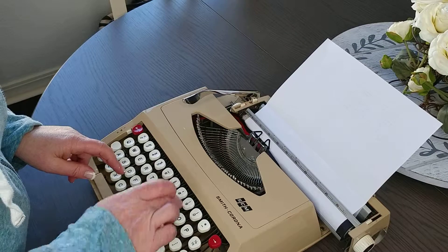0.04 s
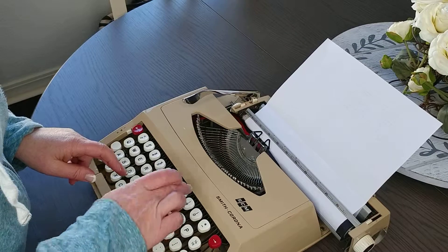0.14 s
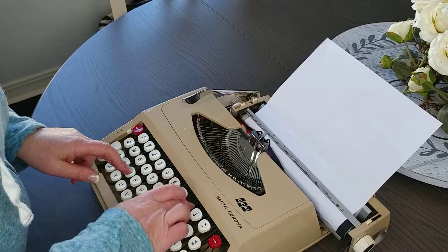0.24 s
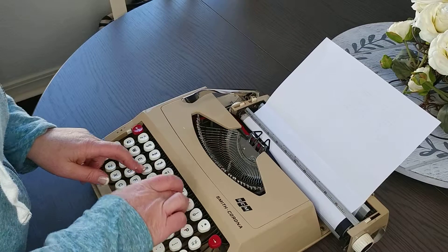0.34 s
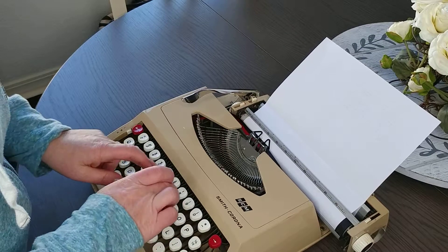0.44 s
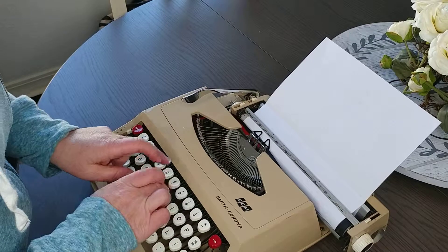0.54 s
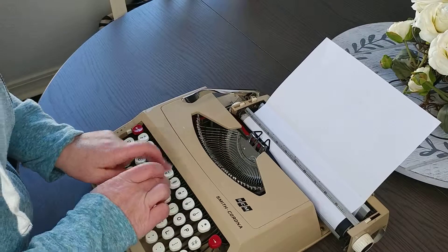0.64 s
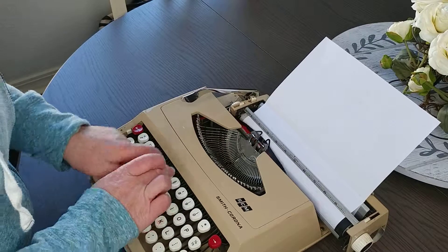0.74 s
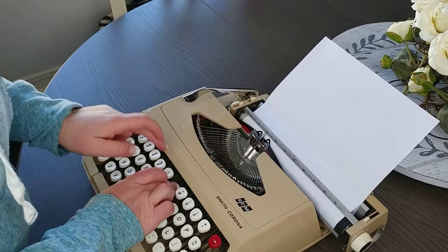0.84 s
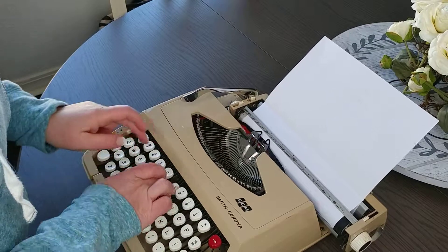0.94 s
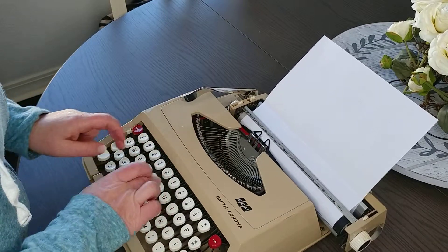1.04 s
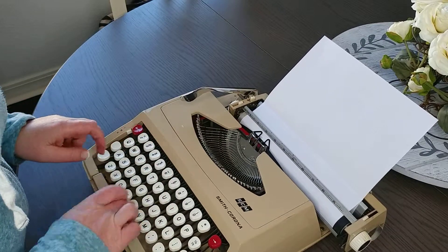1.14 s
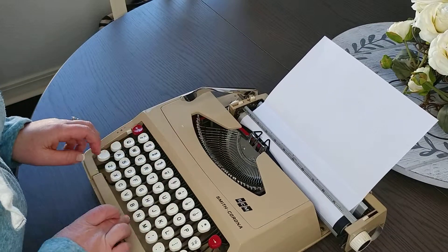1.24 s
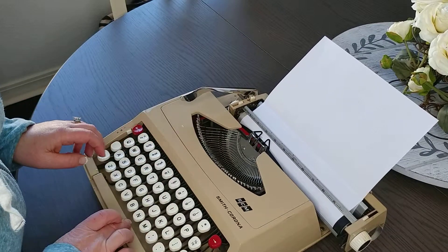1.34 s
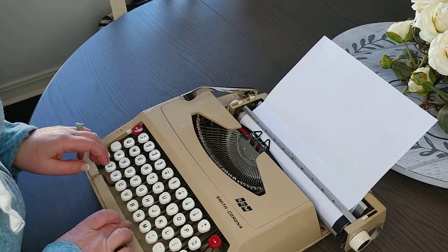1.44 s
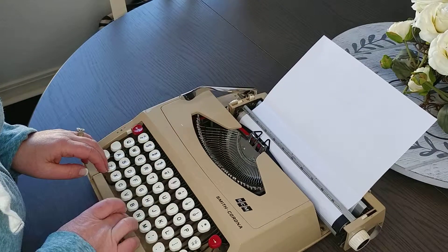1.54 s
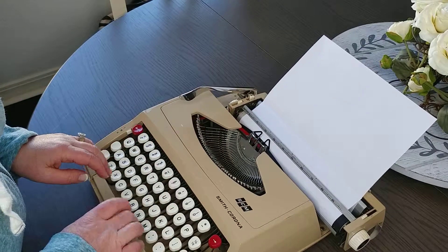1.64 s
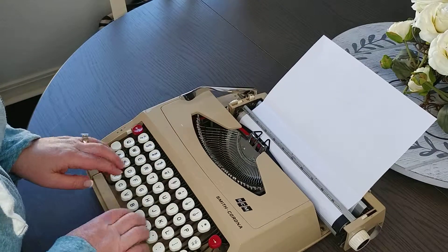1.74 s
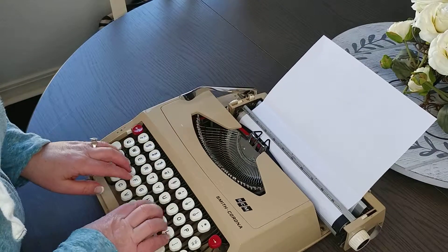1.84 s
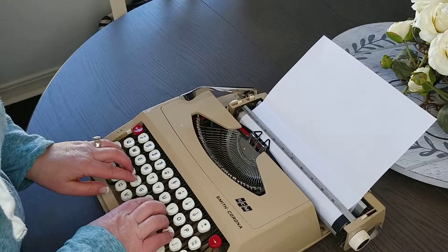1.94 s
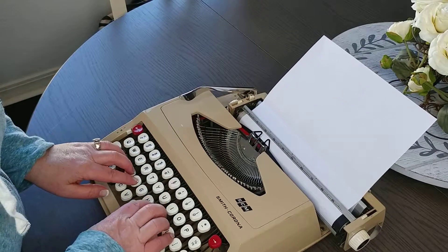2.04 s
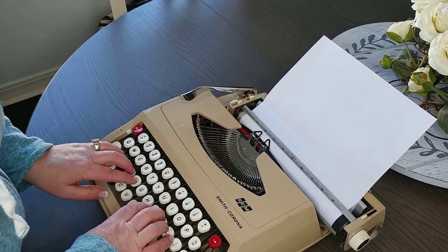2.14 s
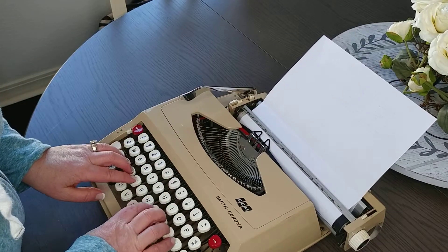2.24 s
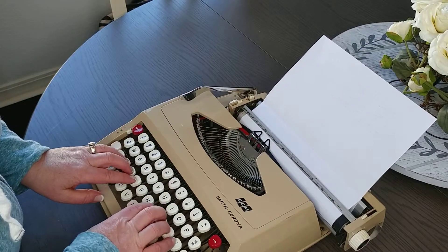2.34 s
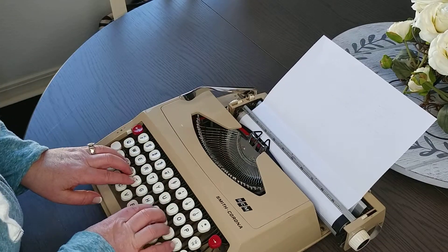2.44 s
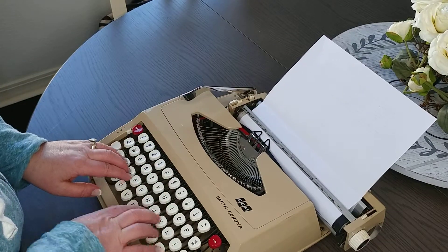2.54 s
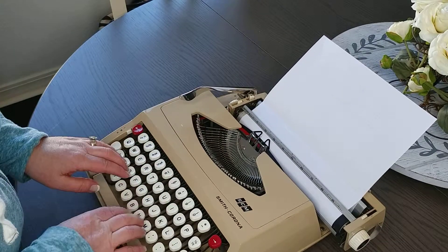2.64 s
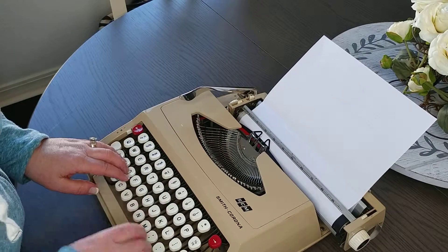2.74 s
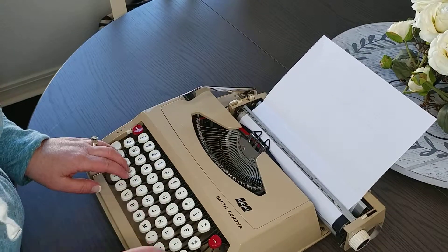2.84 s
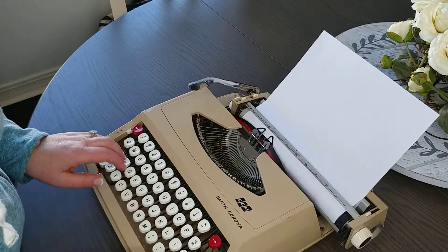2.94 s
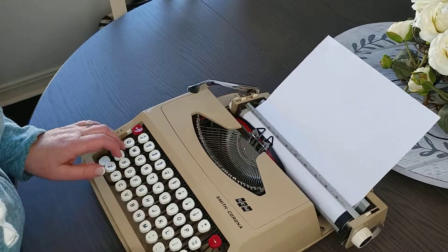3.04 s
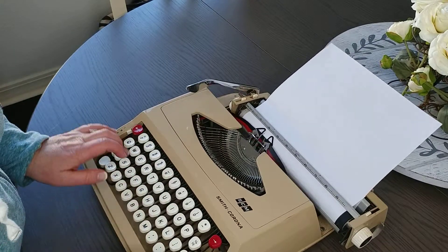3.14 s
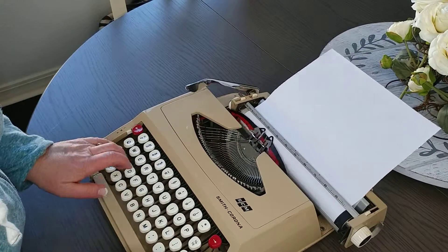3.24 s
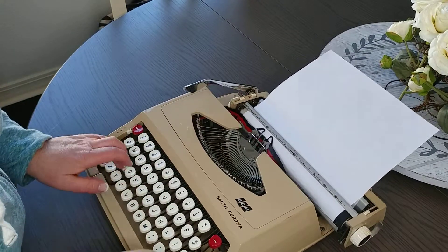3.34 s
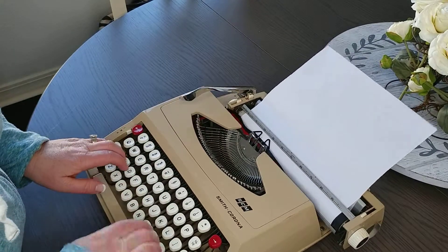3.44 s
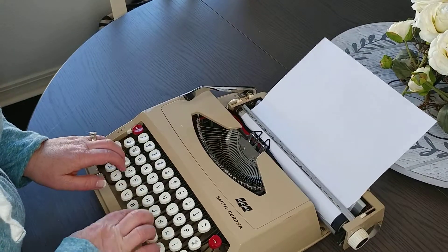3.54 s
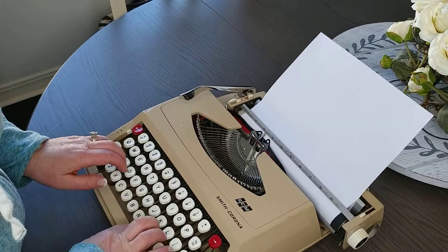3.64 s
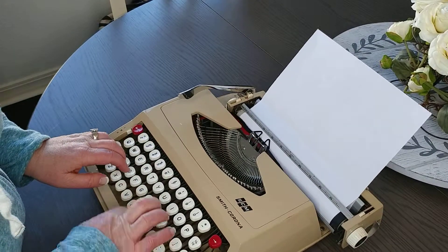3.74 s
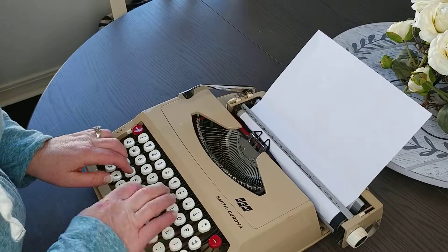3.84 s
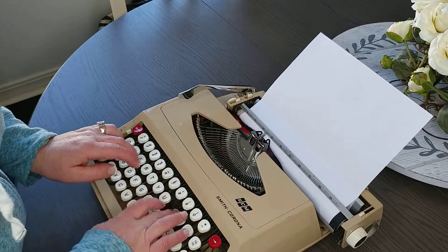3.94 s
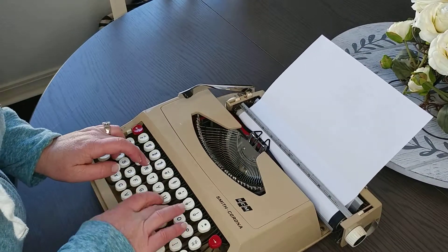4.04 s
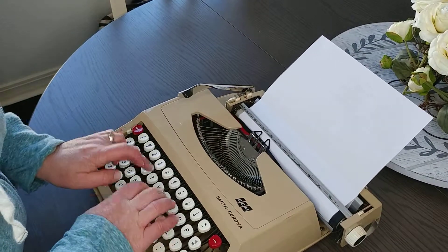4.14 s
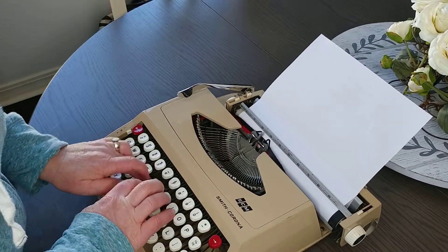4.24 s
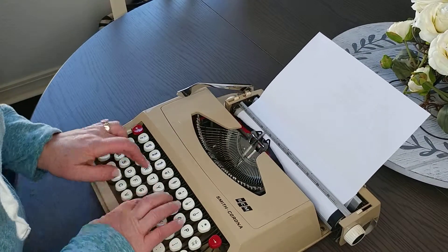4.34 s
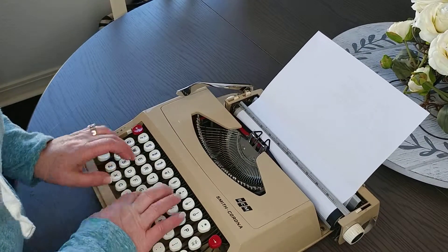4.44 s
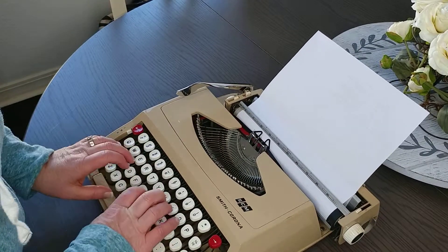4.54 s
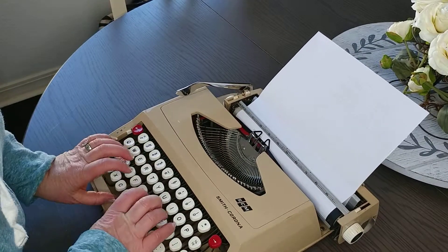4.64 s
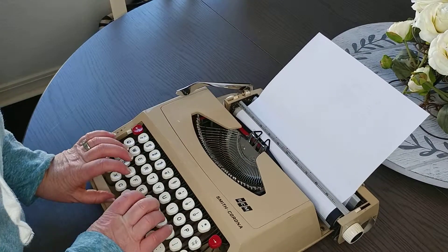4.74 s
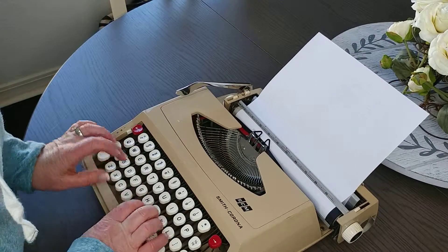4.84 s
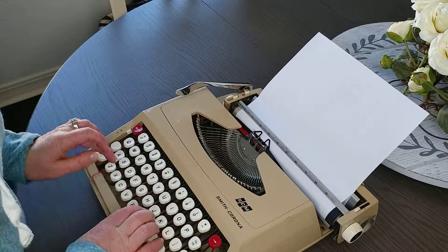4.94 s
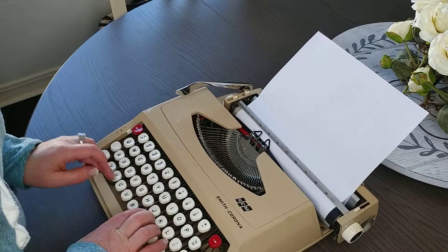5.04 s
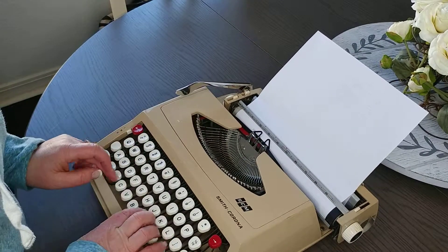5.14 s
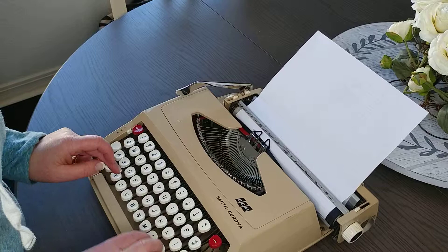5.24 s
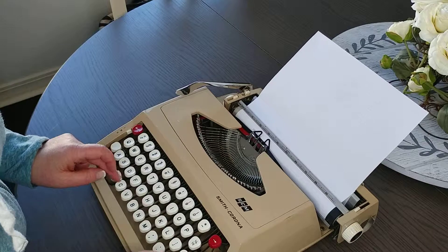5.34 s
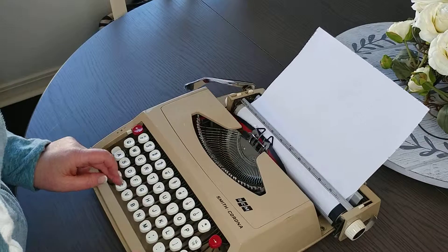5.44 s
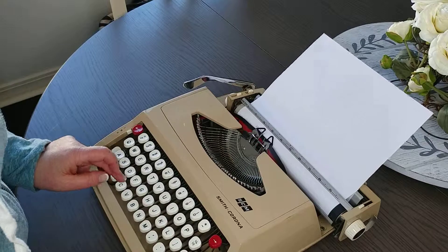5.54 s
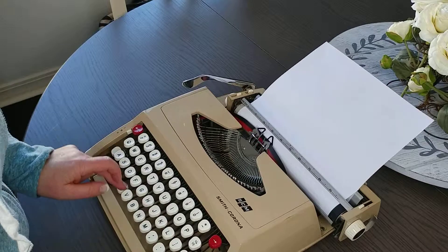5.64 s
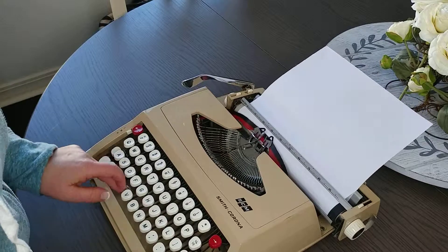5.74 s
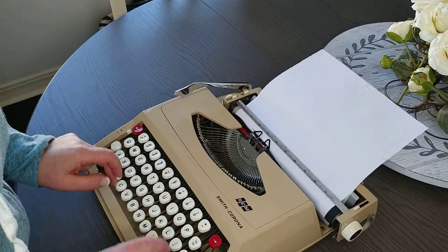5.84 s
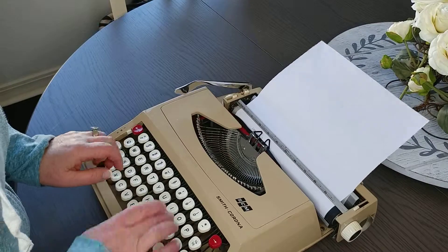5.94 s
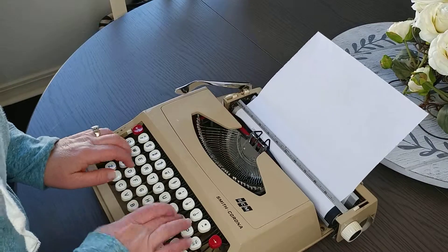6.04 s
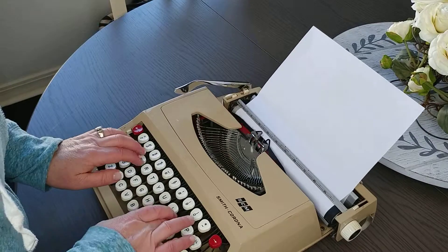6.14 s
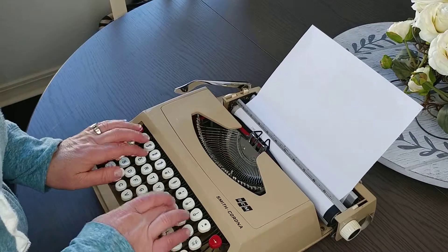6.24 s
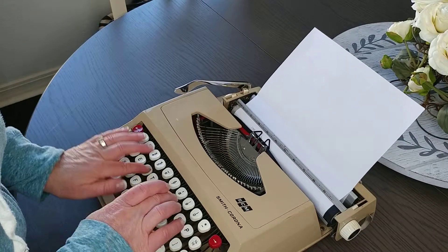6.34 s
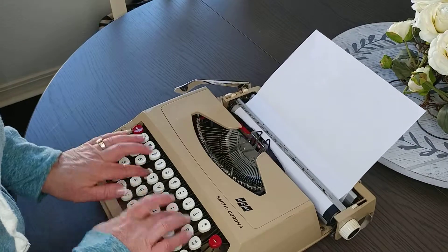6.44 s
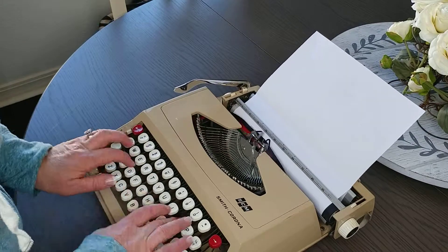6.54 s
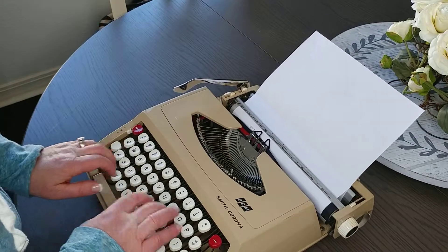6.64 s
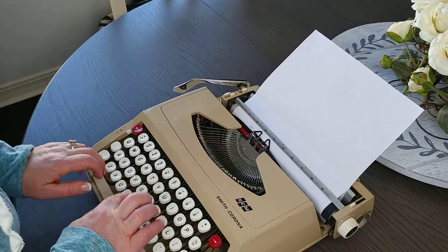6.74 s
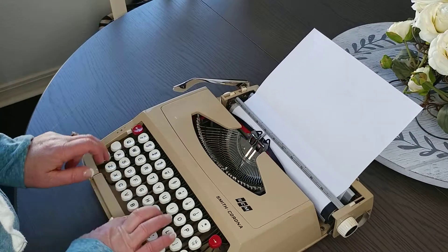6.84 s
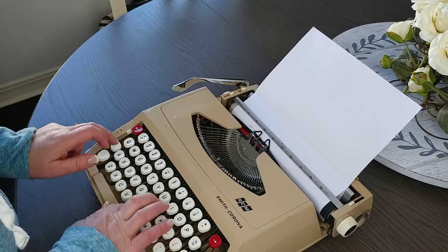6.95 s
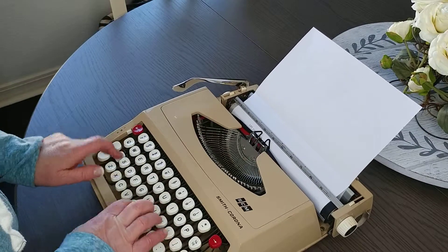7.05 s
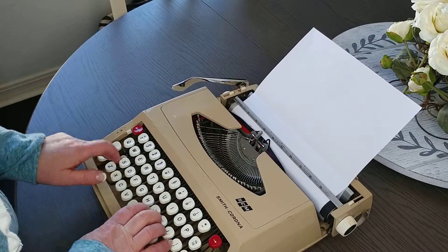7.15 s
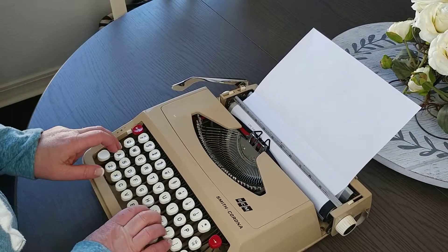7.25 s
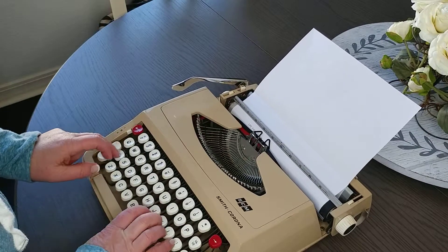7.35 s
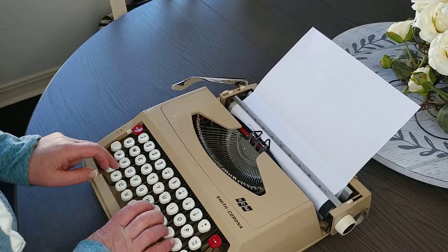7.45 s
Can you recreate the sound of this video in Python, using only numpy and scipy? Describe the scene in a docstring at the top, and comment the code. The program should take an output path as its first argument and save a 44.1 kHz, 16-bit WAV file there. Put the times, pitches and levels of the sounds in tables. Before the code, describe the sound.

Close to the microphone, a manual typewriter's typebars crack against the roller in three short, irregular groups separated by pauses. Lighter rattles and clicks come from the returning levers, the space bar and the shift lifting and dropping the carriage. The blows thud slightly through a wooden table and get a short echo from the quiet room, over a very faint ventilation hum.

```python
"""A quiet room, a portable manual typewriter on a wooden table, a phone's stereo microphones just above.
Close up, each key rattles its linkage, and the typebar cracks against the platen and drops back;
the space bar and the shift clack in between. The blows ring the metal frame and thump the table.
Farther off, ceiling and walls answer; a sleeve brushes between words, over a faint ventilation hum."""
import sys
import numpy as np
from scipy import signal
from scipy.fft import rfft, irfft, next_fast_len
from scipy.io import wavfile
from scipy.ndimage import uniform_filter1d

SR = 44100
rng = np.random.default_rng(int(sys.argv[2]) if len(sys.argv) > 2 else 0)


def wrap_up_sound(samples):
    """Save the sound to the file named by the first command line argument, as 16-bit audio."""
    columns = np.atleast_2d(samples).T
    # keep every value between -1 and 1, then stretch to whole-number steps
    tamed = np.clip(columns, -1, 1)
    steps = np.round(tamed * 32767).astype(np.int16)
    wavfile.write(sys.argv[1], SR, steps)


N = 331191
RING = np.arange(16384) / SR  # time axis of one blow
SWING_S = .036  # from the finger's touch to the blow on the platen
LIFT_S = .037  # from a push on the shift key until the carriage tops out

# typebar on platen: t/s, level/dB, brightness/dB, knock/dB, finger's touch/dB, table top/dB
STRIKES = [(0.3215, -13.5, -0.1, -2.5, -36, -36), (0.7632, -15, -1, -1.5, -55, -45),
           (0.9253, -15.5, -3, -0.5, -31.5, -36), (3.2841, -16.5, 1.5, 0, -45, -59),
           (3.7037, -17.5, -0.5, 4.5, -42, -40), (4.0155, -15.5, -1.2, 0.3, -38.5, -36.5),
           (4.28, -16.5, -1.2, 0.8, -46.5, -37.5), (4.4093, -16, -1, 4, -37, -39),
           (5.742, -14.5, 2, 3, -43.5, -35.5), (6.14, -15, 0, 0, -45.5, -34),
           (6.46, -17, -0.4, 4, -58.5, -35.5), (6.5533, -15, 0, 3, -39, -25.5),
           (6.8888, -14.5, 2, 4.5, -45, -36), (7.1635, -13, 1.5, 1, -35.5, -46)]
# typebars and key levers falling back: t/s, level/dB
RETURNS = [(0.4078, -27), (0.8538, -24.5), (1.0489, -29), (3.413, -32.5), (3.7927, -29), (4.116, -30),
           (4.365, -24), (4.5021, -28), (5.8909, -31.5), (6.2517, -32), (6.2899, -32), (6.685, -31.5),
           (6.991, -34.5), (7.28, -31)]
# space bar going down and up: t/s, level/dB, brightness/dB, lever knock/dB
SPACE_BAR = [(1.4872, -34.5, 8.5, -42), (1.5761, -31.5, 13, -34.5), (4.7195, -31, 9.5, -37.5),
             (4.85, -32, 16.5, -35.5), (7.4519, -35, 2.5, -46)]
# pushes on the shift key, lifting the carriage: t/s, relative scrape/dB, weight/dB
SHIFT_LIFTS = [(-.02, -25.5, -35.5), (.02, -31, -48.5), (2.973, -30.5, -57.5), (3.017, -31, -30),
               (5.423, -40.5, -55), (5.501, -29, -29)]
# carriage falling on its stop: t/s, relative level/dB
SHIFT_DROPS = [(3.476, -21), (5.928, -21.5)]
# modes of frame, segment and cover: f/Hz, relative level/dB
FRAME_MODES = [(735, -3), (860, -7), (1120, -9), (1287, 0), (1803, -3), (2005, -1), (2083, -3), (2255, -2),
               (2540, -4), (2708, -3), (2774, -3), (3193, -4), (3424, -6), (3488, -4), (4545, -4),
               (5488, -4), (5836, -2)]
# spectra of strike, levers, space bar, carriage lift and carriage drop: f/Hz, relative level/dB
STRIKE_COLOUR = [(60, -25.5), (250, -17.5), (550, -12.5), (800, -6.5), (1500, -7.5), (2000, -0.5),
                 (3400, -0.5), (4900, -2.5), (5800, -1.5), (7000, -10), (9200, -2.5), (10500, -15.5),
                 (11800, -10.5), (15500, -17)]
LEVER_COLOUR = [(60, 5), (250, -1.5), (550, 1), (800, -6), (1200, 2.5), (1500, -3), (2000, 0), (4000, -3),
                (6000, -6), (7200, -7.5), (9200, 1.5), (10500, -11.5), (12000, -14), (15500, -13.5)]
SPACE_COLOUR = [(60, 9), (300, 1.5), (550, 4.5), (700, -4.5), (1100, 2), (2000, 0), (3000, -1),
                (4000, -3.5), (7500, -8), (9300, 0), (10500, -19.5), (15500, -39)]
LIFT_COLOUR = [(60, 4), (280, 0), (550, 3.5), (750, 0.5), (1150, 2), (1500, 0.5), (1900, 2), (2700, -2.5),
               (4200, -2), (6300, -6), (7200, -5.5), (9200, 4), (10500, -7.5), (15500, -8.5)]
DROP_COLOUR = [(60, 4.5), (300, -5), (550, -0.5), (750, -1.5), (1150, 0), (1900, 2), (2700, -6), (3800, -1),
               (6300, -4), (7200, -7.5), (9200, 3), (10500, -6.5), (12000, 0.5), (15500, -10.5)]
# the room's reverberation time: f/Hz, t60/s
ROOM_T60 = [(100, 0.99), (260, 0.53), (700, 0.3), (1840, 0.28), (4850, 0.24), (9000, 0.19), (14000, 0.071)]
# sleeve brushing between words: start/s, end/s, level/dB
RUSTLES = [(1.889, 1.95, -73), (2.299, 2.93, -77), (5.121, 5.381, -74.5)]
# spectrum of the ventilation's air: f/Hz, relative level/dB
AIR_COLOUR = [(25, 0), (45, -9), (200, -14.5), (420, -15.5), (700, -23), (1200, -31), (2200, -37),
              (16000, -41)]
# the ventilation's motor tones: f/Hz, level/dB
MOTOR_TONES = [(59.2, -68.5), (118.4, -72.5), (156.1, -78.5), (193.8, -73.5), (301.5, -76), (355.3, -77.5),
               (414.5, -77.5), (532.9, -82.5), (592.2, -90), (710.6, -91.5)]


def typebars(frame_db=-16, lead_s=.00037):
    """Right under the microphones, the type slug hits paper and platen and rings the whole frame."""
    out = np.zeros(N)
    for s, db, bright_db, knock_db, _, _ in STRIKES:
        slug = contact(crack_t60=.0046, buzz_db=-9, buzz_t60=.13)
        hit = unit(colour(slug, STRIKE_COLOUR, bright_db, knock_db))
        add(out, s - lead_s, blow(hit + amp(frame_db) * frame(), db, .027))
    return out


def contact(crack_t60, buzz_db, buzz_t60):
    """Metal meets metal: a brief crack, then the crowded ring of small springs and links."""
    crack, buzz = rng.standard_normal((2, len(RING)))
    crack = even(np.sign(crack) * RING * fade(crack_t60), bins=130) * fade(.01)
    buzz = even(buzz * fade(buzz_t60), bins=12) * (1 - fade(.03)) * fade(.46)
    return unit(crack) + amp(buzz_db) * unit(buzz)


def frame(scatter_db=2, t60=.2):
    """The frame's modes ring, in a slightly different mix with every blow."""
    chance = rng.standard_normal((len(FRAME_MODES), 2))
    ring = sum(amp(db + scatter_db * weight) * np.sign(polarity) * np.sin(2 * np.pi * hz * RING)
               for (hz, db), (weight, polarity) in zip(FRAME_MODES, chance))
    return unit(ring * fade(t60))


def linkages(swing_db=-29, press_s=.013):
    """A finger takes up the key's slack, then the linkage rattles ever harder as the typebar swings up."""
    out = np.zeros(N)
    travel = np.minimum(RING / SWING_S, 1)
    swing = (travel ** 1.3 + 1.5 * travel ** 10) * (travel < 1)
    for s, _, _, _, touch_db, _ in STRIKES:
        touch = contact(crack_t60=.0088, buzz_db=0, buzz_t60=.055) * (1 - fade(press_s))
        add(out, s - SWING_S, blow(colour(touch, LEVER_COLOUR, bright_db=7), touch_db, .08))
        rattle = colour(chatter(swing), LEVER_COLOUR)
        add(out, s - SWING_S, blow(rattle, swing_db, .016))
    return out


def chatter(envelope, spread_db=3, ticks_per_s=1500):
    """Loose joints tick: a swarm of tiny clicks of very uneven size."""
    size = amp(spread_db * np.minimum(rng.exponential(size=len(RING)), 4))
    ticks = (rng.random(len(RING)) < ticks_per_s / SR) * rng.choice([-1, 1], len(RING)) * size
    click = even(rng.standard_normal(128) * fade(.003)[:128], bins=1)
    return unit(np.convolve(ticks * envelope, click)[:len(RING)])


def returns(frame_db=-21, shudder_db=-39, delay_s=.075, shudder_s=.075):
    """Springs pull the bars back: they shudder into the basket and click on their rest."""
    out = np.zeros(N)
    for s, db in RETURNS:
        click = contact(crack_t60=.0022, buzz_db=-5, buzz_t60=.033)
        hit = unit(colour(click, LEVER_COLOUR, bright_db=2.17))
        add(out, s, blow(hit + amp(frame_db) * frame(), db, .014))
    swell = np.sin(np.pi * np.minimum(RING / shudder_s, 1))
    for s, *_ in STRIKES:
        shudder = colour(chatter(swell), LEVER_COLOUR, bright_db=-2.4)
        add(out, s + delay_s, blow(shudder, shudder_db, .046))
    return out


def space_bar(slack_s=.024, creak_db=-12, growth_db=22):
    """The bar creaks through its slack, the carriage steps with a bright clack, and the levers knock."""
    out = np.zeros(N)
    take_up = amp(growth_db * np.minimum(RING / slack_s, 1)) * (RING < slack_s)
    for s, db, bright_db, lever_db in SPACE_BAR:
        clack = contact(crack_t60=.0038, buzz_db=-4.1, buzz_t60=.032)
        add(out, s, blow(colour(clack, SPACE_COLOUR, bright_db), db, .016))
        levers = colour(chatter(fade(.063)), SPACE_COLOUR, bright_db=-2.3, knock_db=8.1)
        add(out, s, blow(levers, lever_db, .015))
        creak = colour(chatter(take_up), SPACE_COLOUR, bright_db=-.5)
        add(out, s - slack_s, blow(creak, lever_db + creak_db, slack_s))
    return out


def shift_lifts(scrape_gain_db=2, top_out_gain_db=-4):
    """The carriage scrapes and chatters as the shift key lifts it, then tops out dully."""
    out = np.zeros(N)
    push = (fade(.18) + fade(.12)) * (1 - fade(.021))
    for s, db, weight_db in SHIFT_LIFTS:
        scrape = colour(chatter(push), LIFT_COLOUR, bright_db=-.6)
        add(out, s, blow(scrape, db + scrape_gain_db, .022))
        top_out = colour(chatter(fade(.16)), LIFT_COLOUR, bright_db=-14)
        add(out, s + LIFT_S, blow(top_out, weight_db + top_out_gain_db, .019))
    return out


def shift_drops(slide_s=.055, slide_gain_db=-16, bounce_s=.06, frame_db=-20):
    """The carriage slides down its guides, clicks on its stop and bounces once, softer and duller."""
    out = np.zeros(N)
    for s, db in SHIFT_DROPS:
        for delay_s, gain_db, bright_db in (0, 1, 0), (bounce_s, -3, -1):
            click = contact(crack_t60=.0052, buzz_db=-6.5, buzz_t60=.032)
            hit = unit(colour(click, DROP_COLOUR, bright_db))
            add(out, s + delay_s, blow(hit + amp(frame_db) * frame(), db + gain_db, .011))
        slide = colour(chatter(RING < slide_s), DROP_COLOUR, bright_db=-2.8)
        add(out, s - slide_s, blow(slide, db + slide_gain_db, .041))
    return out


def table(give_s=.004, drop_give_s=.018):
    """Every blow passes its weight through the rubber feet into the wooden table."""
    out = np.zeros(N)
    for s, db, *_, top_db in STRIKES:
        add(out, s + give_s, thump(sway_db=db - 23, top_db=top_db))
    for s, _ in RETURNS:
        add(out, s, thump(sway_db=-41.5, top_db=-44))
    for s, *_ in SPACE_BAR:
        add(out, s + give_s, thump(sway_db=-39.5, top_db=-47))
    for s, _, weight_db in SHIFT_LIFTS:
        add(out, s + LIFT_S, thump(sway_db=weight_db, top_db=weight_db - 8))
    for s, _ in SHIFT_DROPS:
        add(out, s + drop_give_s, thump(sway_db=-32.5, top_db=-40))
    return out


def thump(sway_db, top_db, sway_hz=36, top_hz=118):
    """The machine sways on its feet and the table top booms, with a dull rumble of its other modes."""
    sway = amp(sway_db) * np.sin(2 * np.pi * sway_hz * RING) * fade(.37)
    top = amp(top_db) * np.sin(2 * np.pi * top_hz * RING) * fade(.44) * (1 - fade(.096))
    wood = [(20, -1.5), (50, 6), (85, -3.5), (160, -11.5), (400, -16), (1200, -47)]
    rumble = colour(rng.standard_normal(len(RING)) * fade(.51), wood)
    return sway + top + blow(rumble, (sway_db + top_db) / 2 - 3, .024)


def room(near_db, wall_db, lag_s, wall_s=.008, ceiling_s=.0098, ceiling_db=-14):
    """A click reaches the left microphone first; table and paper scatter it; ceiling and walls answer."""
    paths = np.zeros((2, len(RING)))
    paths[0, 0] = paths[1, round(lag_s * SR)] = 1
    paths[:, int(ceiling_s * SR)] = amp(ceiling_db)
    near = diffuse(len(RING)) * fade(.018) * (1 - fade(.0035))
    hz = np.fft.rfftfreq(len(RING), 1 / SR)
    field, tail = rfft(diffuse(len(RING))), 0
    centres = np.geomspace(100, 14000, 8)
    for centre, weights in zip(centres, np.eye(len(centres))):
        band = np.interp(np.log(hz + 1), np.log(centres), weights)
        tail = tail + irfft(field * band, len(RING)) * fade(curve(ROOM_T60, centre))
    # the first reflections arrive together and stand above the later ones
    tail = tail * (RING > wall_s) * (1 + 1.7 * fade(.065))
    scattered = amp(near_db) * unit(near) + amp(wall_db) * unit(tail)
    return even(paths + np.sqrt(2) * scattered, bins=35)


def in_room(dry, near_db, wall_db, lag_s):
    """Hands and paper move between keystrokes, so each stroke meets its own pattern of reflections."""
    out = np.zeros((2, N))
    starts = [0] + [int((s - SWING_S) * SR) for s, *_ in STRIKES]
    for start, end in zip(starts, starts[1:] + [N]):
        response = room(near_db, wall_db, lag_s)
        wet = signal.fftconvolve(dry[None, start:end], response, axes=1)[:, :N - start]
        out[:, start:start + wet.shape[1]] += wet
    return out


def sleeve():
    """A sleeve brushes between words: soft swells of high hiss."""
    t = np.arange(N) / SR
    swell = sum(amp(db) * np.interp(t, [start, (start + end) / 2, end], [0, 1, 0])
                for start, end, db in RUSTLES)
    cloth = [(1000, -11.5), (3500, -5), (4800, -1), (6000, -4), (7000, -7.5), (9300, -4), (11000, -20)]
    return swell * wash(cloth)


def ventilation(air_db=-61):
    """Room tone: soft low air noise with a few steady motor tones."""
    t = np.arange(N) / SR
    hum = sum(amp(db) * np.sqrt(2) * np.sin(2 * np.pi * (hz * t + rng.random()))
              for hz, db in MOTOR_TONES)
    return amp(air_db) * wash(AIR_COLOUR) + hum


def wash(points):
    """Steady stereo noise of unit level, coloured by (f/Hz, level/dB) points."""
    n = next_fast_len(N, real=True)
    gain = amp(curve(points, np.fft.rfftfreq(n, 1 / SR)))
    noise = irfft(rfft(diffuse(n)) * gain, n)[:, :N]
    return noise / noise.std()


def diffuse(n, apart_hz=850):
    """Noise from all sides: alike at both microphones in the bass, unrelated in the treble."""
    likeness = np.exp(-(np.fft.rfftfreq(n, 1 / SR) / apart_hz) ** 2)
    mid, side = (irfft(rfft(rng.standard_normal(n)) * np.sqrt((1 + sign * likeness) / 2), n)
                 for sign in (1, -1))
    return np.array([mid + side, mid - side])


def colour(x, points, bright_db=0, knock_db=0):
    """Filter by (f/Hz, level/dB) points; brightness tilts the treble up, knock lifts the hollow middle."""
    hz = np.fft.rfftfreq(len(x), 1 / SR)
    bright = np.clip(np.log2((hz + 1) / 4000), -.5, 2)
    knock = np.exp(-np.log2((hz + 1) / 850) ** 2)
    return shape(x, curve(points, hz) + bright_db * bright + knock_db * knock)


def even(x, bins):
    """Level the spectrum over a span of bins: many crowded resonances, none standing out."""
    power = uniform_filter1d(np.abs(rfft(x)) ** 2, bins)
    return shape(x, -10 * np.log10(power + 1e-12))


def shape(x, db):
    """Minimum-phase filter with the given gain per frequency bin."""
    n = x.shape[-1]
    cepstrum = irfft(np.log(amp(db)), n)
    cepstrum[..., 1:n // 2] *= 2
    cepstrum[..., n // 2 + 1:] = 0
    return irfft(rfft(x) * np.exp(rfft(cepstrum)), n)


def curve(points, hz):
    """Join (f/Hz, value) points on a log-frequency axis."""
    f, value = np.transpose(points)
    return np.interp(np.log(hz + 1e-3), np.log(f), value)


def blow(x, db, span_s):
    """Give a blow the energy of a level of db held for span_s seconds."""
    return amp(db) * np.sqrt(span_s * SR) * unit(x)


def fade(t60):
    """Exponential decay, 60 dB down after t60 seconds."""
    return np.exp(-np.log(1000) * RING / t60)


def add(track, s, x):
    """Mix x into the track from time s on."""
    i = int(min(s * SR, N - 1))
    x = x[max(-i, 0):N - i]
    track[max(i, 0):max(i, 0) + len(x)] += x


def amp(db):
    """Decibels to gain."""
    return 10 ** (np.asarray(db) / 20)


def unit(x):
    """Scale to unit energy."""
    return x / np.sqrt(np.sum(x ** 2))


def scene():
    """The platen faces the microphones; the key action, under the cover, is heard more by reflection."""
    platen = in_room(typebars(), near_db=.5, wall_db=-.5, lag_s=.00011)
    keys = linkages() + returns() + space_bar() + shift_lifts() + shift_drops()
    action = in_room(keys, near_db=5, wall_db=2, lag_s=.00005)
    thumps = table() * amp([[1], [-1]])  # a little to the left
    return platen + action + thumps + ventilation() + sleeve()


def record(dry, ceiling=1.1, top_hz=15700):
    """The phone rounds off the tips of the cracks and cuts the top."""
    rounded = ceiling * np.tanh(dry / ceiling)
    return signal.sosfilt(signal.ellip(10, .2, 80, top_hz, fs=SR, output="sos"), rounded)


dry = scene()
out = record(dry)
wrap_up_sound(out)
```